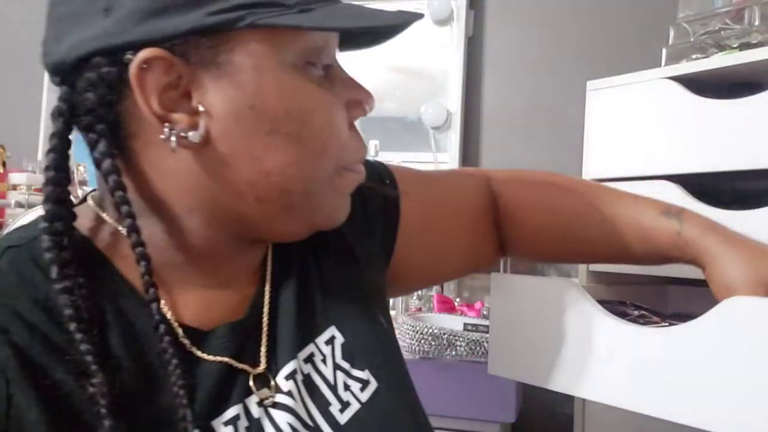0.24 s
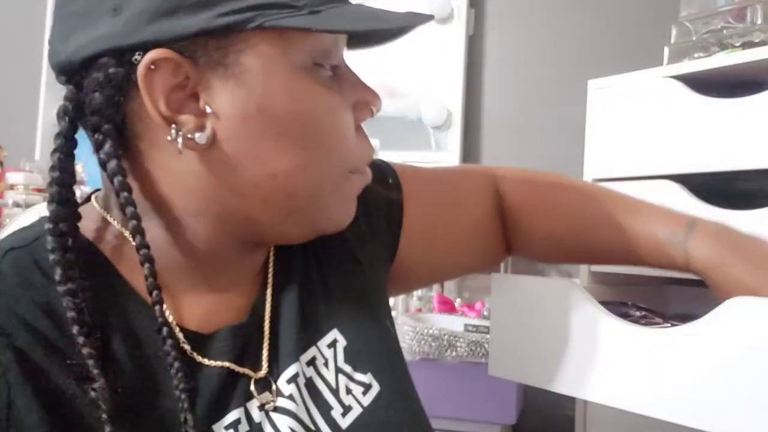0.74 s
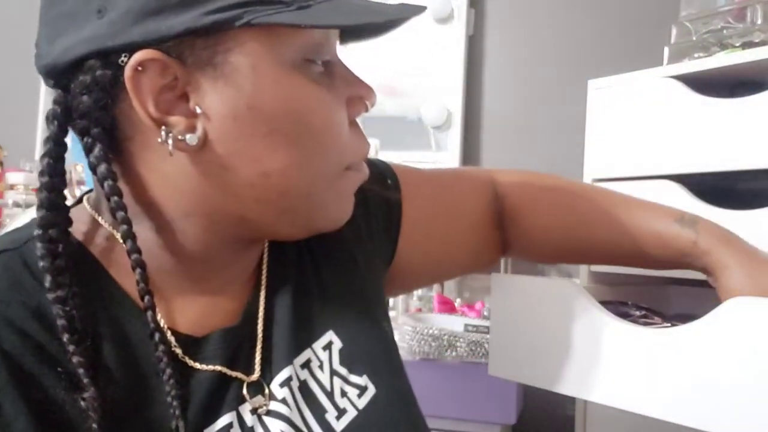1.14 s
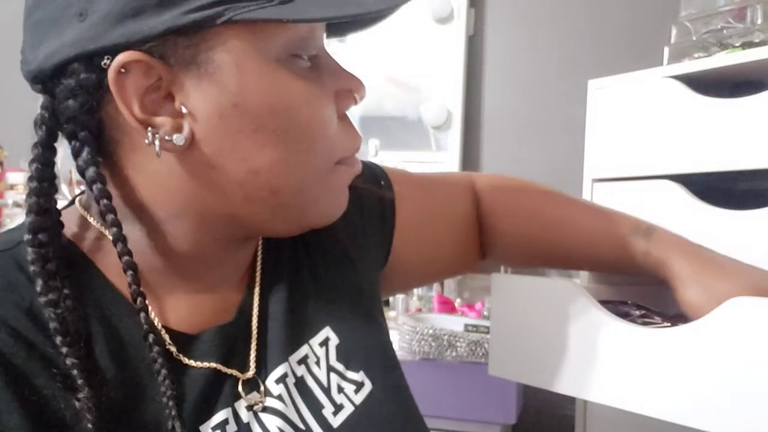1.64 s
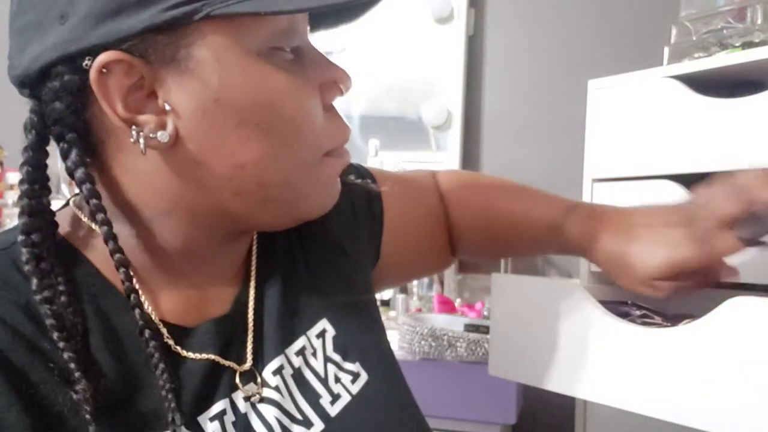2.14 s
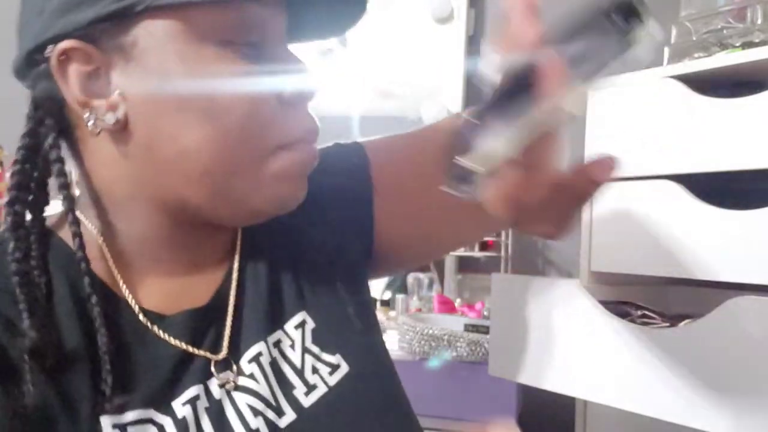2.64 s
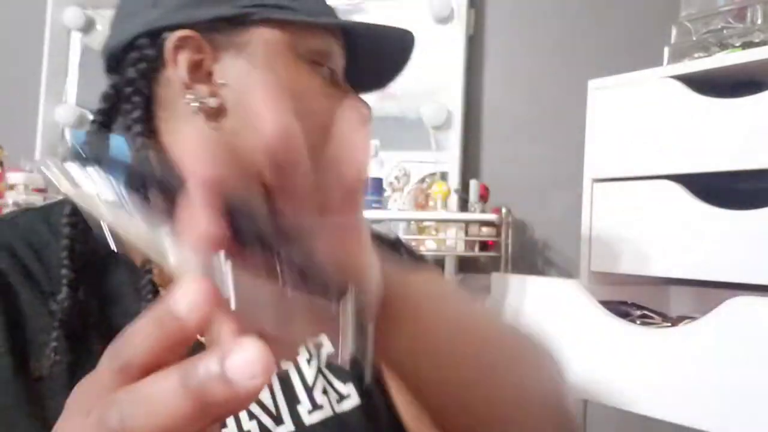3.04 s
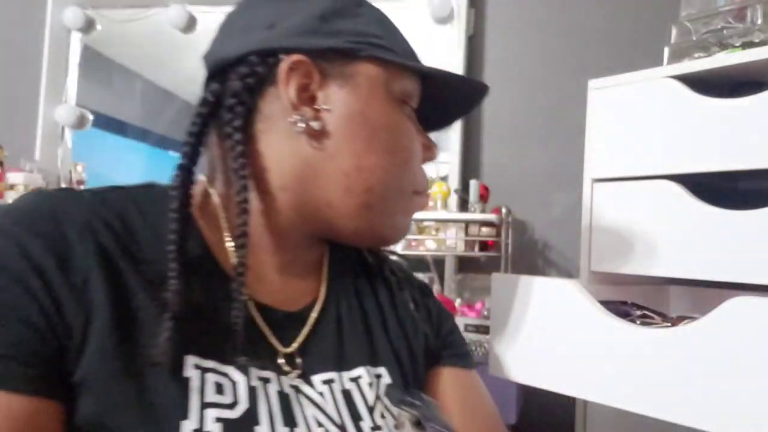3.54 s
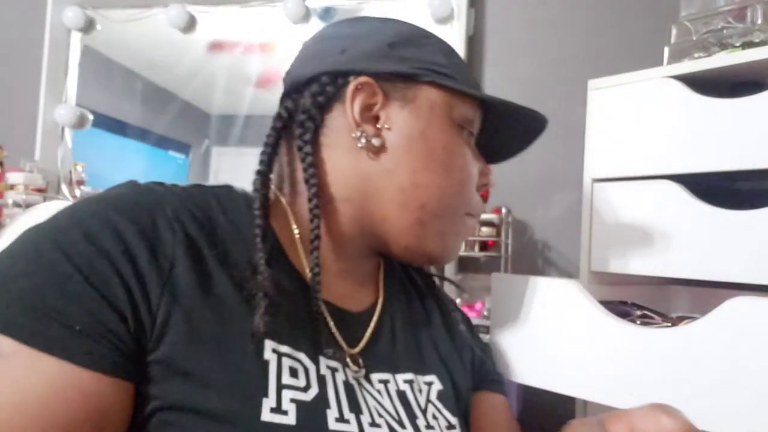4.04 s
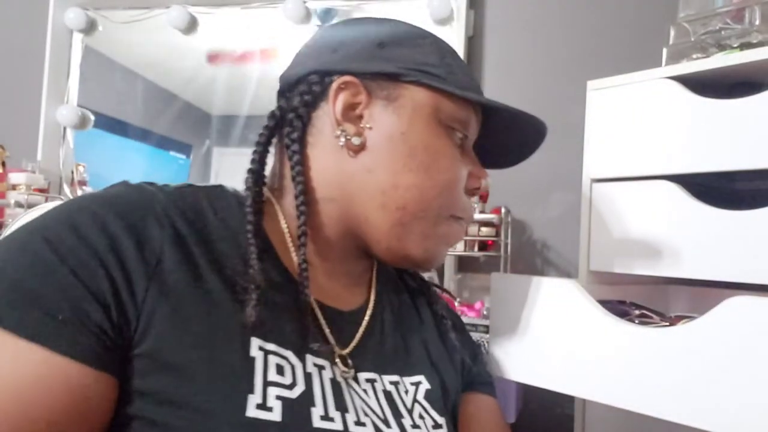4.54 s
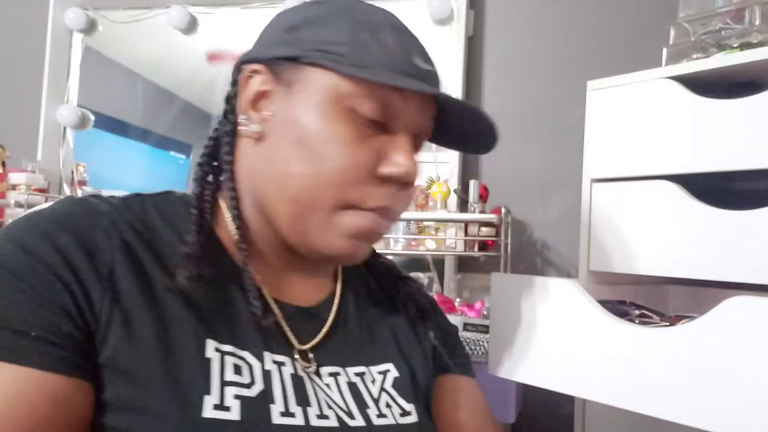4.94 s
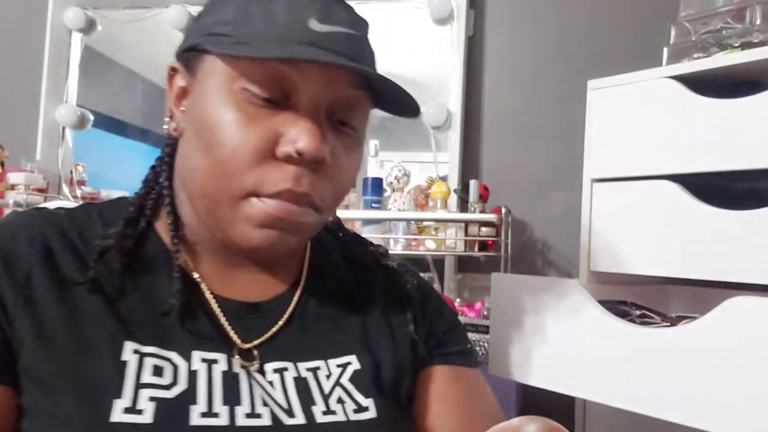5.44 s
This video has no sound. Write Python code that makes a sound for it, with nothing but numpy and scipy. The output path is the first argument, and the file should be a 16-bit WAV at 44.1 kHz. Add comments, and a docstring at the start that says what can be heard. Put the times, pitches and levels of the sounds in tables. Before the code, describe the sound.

Hollow plastic knocks and scrapes from searching a drawer, followed by soft, close crinkling of the wrap around a pair of sunglasses.

```python
"""A small quiet room, with a two-port stereo microphone and everything a little to its left.
A hand rummages in a plastic drawer: sunglasses knock and skid against its walls and set it ringing.
One pair is lifted out with a brush of sleeve, and close to the microphone its thin plastic wrap
crinkles as the creases snap over. Behind it all are a faintly throbbing fan, a low hum and still air."""
import sys
import numpy as np
from scipy import signal
from scipy.fft import rfft, irfft
from scipy.io import wavfile
from scipy.ndimage import uniform_filter1d

SR = 44100
rng = np.random.default_rng(int(sys.argv[2]) if len(sys.argv) > 2 else 0)


def int16_out(signal):
    """Quantize to a 16-bit WAV file."""
    q = np.round(np.clip(np.atleast_2d(signal).T, -1, 1) * 32767)
    wavfile.write(sys.argv[1], SR, q.astype(np.int16))


N = 250047
TIME = np.arange(N) / SR


# Blows in the drawer. Each row: start in seconds, relative level of the hollow knock in dB,
# then floor thump, clack and sharp edge in dB, each added to that level.
DRAWER_KNOCKS = [(0.156, -55.5, -29, 0.5, -16), (0.232, -25, -10.5, -5.5, -20.5),
                 (0.32, -35.5, -11, -4.5, -13.5), (0.358, -32.5, -2, 6, -6.5), (0.424, -24, -13, 2, -6.5),
                 (0.437, -29, -4.5, -5, 1), (0.475, -41.5, -8, -15, -19), (0.518, -37, -9, -1, -5.5),
                 (0.546, -40.5, -17, -24, -13), (0.907, -45, -12, -8, -21), (0.931, -41.5, -10, -6.5, -25),
                 (1.004, -35, -16, -7, -17), (1.02, -32, -11, 3, -5.5), (1.063, -31, -4, -3.5, -32),
                 (1.079, -45, -7, 7.5, -1), (1.168, -42, -31, -5.5, -13.5), (1.205, -44.5, -11, -6, -22),
                 (1.263, -39.5, -28, 0.5, -34), (1.297, -38, -6, 1, -7), (1.368, -57.5, 4.5, -25, 9.5),
                 (1.465, -40, -20, -5.5, -9), (1.484, -39, -24, -7, -1), (1.518, -53.5, 3, -22, 3.5),
                 (1.631, -52.5, -6, 4.5, -5), (1.72, -37.5, -40, -0.5, -10.5), (1.795, -46, -25, -2, -21),
                 (1.905, -29.5, -20, -6, -5.5), (1.928, -31, -10.5, -3.5, -5.5),
                 (2.029, -40, -11, -0.5, -16), (2.038, -37.5, -3.5, -0.5, -14), (2.061, -43.5, -1, 0, -11),
                 (2.143, -35.5, -6, 2.5, 2), (2.399, -54, -24.5, -20, -34.5)]

def rummage(gain_db=-6, skid_gain=0.54, skid_per_s=1100, skid_s=0.005, size=3000):
    """Sunglasses hit the drawer: a first contact, then a short skid of smaller ones."""
    out, t = np.zeros((2, N)), np.arange(size) / SR
    edges_hz = [30, 280, 1000, 4000, 20000]
    for start, db, thump, clack, edge in DRAWER_KNOCKS:
        contacts = skid_gain * sparse_clicks(skid_per_s, size) * np.exp(-t / skid_s)
        first = np.pad(drawer_ring(), ((0, 0), (0, size - 1)))
        skid = signal.fftconvolve(contacts[None], drawer_ring(), axes=1)
        levels_db = gain_db + db + np.array([thump + 1, 0, clack + 1, edge + 3])
        add(out, start, set_bands(first + skid, edges_hz, levels_db))
    return out


# Spectrum of a plastic clack. Each row: frequency in Hz, relative level in dB.
CLACK_SPECTRUM = [(60, -35.5), (130, -8), (240, -11.5), (390, 3), (680, 2.5), (1000, -0.5), (1300, 4.5),
                  (1800, -4), (3000, -3), (4500, -7), (7400, -7.5), (8800, -18.5), (12000, -14),
                  (15500, -19.5)]
# Modes of the drawer and its contents. Each row: frequency in Hz, relative level in dB, t60 in seconds.
DRAWER_MODES = [(146, -5, .12), (178, -12, .12), (379, 2, .18), (436, -12, .11), (648, -1, .14),
                (710, -2, .14), (895, -8, .1), (1094, -7, .14), (1239, 1, .13), (1287, -1, .11),
                (1397, -1, .12), (1737, -9, .1), (2028, -10, .08), (2520, -10, .08), (2871, -11, .08),
                (3709, -12, .07), (4908, -10, .07)]

def drawer_ring(ring_db=-0.5, wet_db=-3, size=12000):
    """One blow: a dense clack thrown about inside the drawer, plus the drawer's modes."""
    clack = unit_rms(colour(room(wet_db, near_s=.011, size=size), CLACK_SPECTRUM))
    modes = ring(DRAWER_MODES, vary_db=3.5, detune=.008, size=size)
    return clack + amp(ring_db) * modes


# Pushes across the drawer floor. Each row: start and length in seconds, relative level and treble in dB.
DRAWER_SHOVES = [(0.324, 0.038, -30, 2), (0.402, 0.016, -34.5, -3), (0.976, 0.047, -36, -8),
                 (1.153, 0.025, -61.5, 15.5), (1.256, 0.022, -33.5, -5.5), (1.458, 0.041, -41, -5),
                 (1.679, 0.022, -39, -9), (1.887, 0.057, -38.5, -26), (2.014, 0.011, -43, -10)]

def shoves(gain_db=-3, build_db=10.5, stir_db=-68, treble_hz=2500):
    """The hand stirs lightly as it searches; its pushes build up, then things slide to rest."""
    out = amp(stir_db) * slide(gesture(start=0.9, length=1.32, rise_s=0.03, fall_db_per_s=134))
    for start, length, db, treble_db in DRAWER_SHOVES:
        build = amp(build_db * np.clip((TIME - start) / length - 1, -1, 0))
        scrape = slide(build * gesture(start, length, rise_s=.004, fall_db_per_s=452.5))
        dull = signal.lfilter(*signal.butter(1, treble_hz, fs=SR), scrape + 1e-18)
        out += amp(gain_db + db) * (dull + amp(treble_db) * (scrape - dull))
    return out


def slide(force):
    """Things stick and slip as hard as they are pushed; every slip rings the drawer."""
    body = drawer_ring(ring_db=-5, wet_db=-4.5)
    slips = grains(per_s=970, spread_db=1.66) * force
    return excite(body, slips)


# Modes of a small hard part. Each row: frequency in Hz, relative level in dB, t60 in seconds.
PART_MODES = [(2050, -8, 0.1), (2880, -9, 0.08), (3690, 0, 0.04), (4040, 0, 0.05), (4450, -4, 0.035)]

def scuff(start=0.751, rub_s=0.031, rub_db=-58, touch_db=-64):
    """One thin squeak in the drawer: a light touch, then a rub that keeps the same modes ringing."""
    modes = ring(PART_MODES, vary_db=1, detune=.003, size=6000)
    force = gesture(start, rub_s, rise_s=rub_s, fall_db_per_s=237)
    out = amp(rub_db) * excite(modes, grains(per_s=1800, spread_db=2.5) * force)
    add(out, start, amp(touch_db) * modes / abs(modes).max())
    return out


# Creases snapping close to the microphone. Each row: start in seconds, relative level in dB,
# then body and top in dB, each added to that level.
WRAP_SNAPS = [(3.3203, -61.5, -6, -2), (3.6247, -63, -20, 8), (3.6642, -49.5, -29, -5.5),
              (3.7399, -50, -28, 5.5), (3.7527, -47, -7, 4), (3.759, -37, -13, -6), (3.7958, -45, -9, 1.5),
              (3.85, -45.5, -17, -3.5), (3.8821, -52.5, -20, -5), (3.9721, -45, -30, 0.5),
              (4.151, -46.5, 1.5, 0), (4.1764, -49, 0.5, 6), (4.209, -60, 2, 11), (4.2514, -50, -3, 3),
              (4.2989, -46.5, -2, -8), (4.3247, -39.5, -0.5, 1.5), (4.386, -39.5, -8, -3),
              (4.5728, -41.5, -9, -10), (4.7539, -43, -6.5, -23), (4.7738, -48, -2.5, 2),
              (4.83, -54, -7, 12), (4.8431, -47.5, -12, 7), (4.8848, -42.5, -26, 2),
              (4.9614, -47, -22, 3.5), (4.9848, -42, -28, 1), (5.015, -44, -26, -6),
              (5.0785, -47.5, -26, -0.5), (5.165, -46.5, -11, 1), (5.1783, -38.5, -13, 6.5),
              (5.1895, -38, -22, -7), (5.2051, -35, -18, -6), (5.2589, -50, -25, -6), (5.3415, -44, -5, 1),
              (5.3486, -51, -8, -1), (5.4177, -49, 1, -17), (5.4497, -51.5, -5.5, -2),
              (5.5638, -43.5, -7, -2), (5.6238, -51.5, -18, -11), (5.6614, -42, -10, -2)]
# Spectrum of a crease in the thin film. Each row: frequency in Hz, relative level in dB.
FILM_SPECTRUM = [(400, -13), (900, -7), (1250, -10.5), (1800, -3), (2800, 5.5), (4000, 4.5), (5500, 5.5),
                 (7500, 11), (8600, 1), (10000, 2), (12000, 5.5), (15500, 2)]
# Modes of the sunglasses' frame. Each row: frequency in Hz, relative level in dB, t60 in seconds.
FRAME_MODES = [(1225, 9, 0.045), (2620, -1, 0.035), (3215, -1, 0.03), (4000, -8, 0.03), (7500, 13, 0.07)]

def snaps(gain_db=-2, frame_db=-14, fold_db=3.2, flip_at_s=.0012, size=9000):
    """A crease flips, sets off its neighbours and taps the frame; hands and walls throw it back."""
    out, t = np.zeros((2, N)), np.arange(size) / SR
    fold_hz, edges_hz = np.geomspace(800, 16000, 22), [800, 3400, 9000, 20000]
    pulse = np.exp(-((t - flip_at_s) / .0003) ** 2)  # under a millisecond wide
    for start, db, body, top in WRAP_SNAPS:
        flip = unit_rms(rng.standard_normal((2, size)) * pulse)
        echo = amp(-1) * unit_rms(room(wet_db=-4, near_s=.005, size=size) * (t > flip_at_s))
        chain = .3 * sparse_clicks(per_s=700, size=size) * np.exp(-t / .006)
        neighbours = signal.fftconvolve(flip, chain[None], axes=1)[:, :size]
        film = colour(flip + echo + neighbours, FILM_SPECTRUM)
        # every fold has its own resonances
        fold = np.c_[fold_hz, fold_db * rng.standard_normal(len(fold_hz))]
        crack = unit_rms(colour(film, fold))
        crack += amp(frame_db) * ring(FRAME_MODES, vary_db=3, detune=.03, size=size)
        levels_db = gain_db + db + np.array([body - 1, 0, top + 3])
        add(out, start, set_bands(crack, edges_hz, levels_db))
    return out


# Fingers squeezing the wrap, close up. Each row: start and length in seconds, relative level in dB.
WRAP_SQUEEZES = [(3.314, 0.031, -65.5), (3.514, 0.13, -65), (3.772, 0.029, -65), (3.854, 0.074, -57.5),
                 (4.07, 0.34, -57), (4.117, 0.048, -49), (4.419, 0.039, -58), (4.564, 0.017, -56),
                 (4.755, 0.056, -54), (4.872, 0.019, -46.5), (4.994, 0.11, -55), (5.171, 0.037, -45.5),
                 (5.258, 0.25, -56), (5.55, 0.014, -48.5)]

def crinkle(gain_db=-0.5, clump_s=0.013, clump_db=5, patches=6):
    """Small creases give way in uneven clumps, each patch of film with its own short ring."""
    squeezes = [amp(db) * gesture(start, length, rise_s=0.0072, fall_db_per_s=192)
                for start, length, db in WRAP_SQUEEZES]
    pressure = np.linalg.norm(squeezes, axis=0)
    wander = np.interp(TIME / clump_s, np.arange(N), rng.standard_normal(N))
    clumps = unit_rms(amp(clump_db * wander))
    out = 0
    for _ in range(patches):
        clicks = grains(per_s=100, spread_db=4.2) * clumps * pressure
        patch = colour(room(wet_db=-3, near_s=.0015), FILM_SPECTRUM)
        out += excite(patch, clicks)
    return amp(gain_db) * out / np.sqrt(patches)


# Swings of the arm. Each row: middle and half length in seconds, relative level in dB.
ARM_SWINGS = [(2.85, 0.33, -72), (4.24, 0.64, -70), (5.507, 0.27, -59.5)]
# Spectrum of brushing cloth. Each row: frequency in Hz, relative level in dB.
CLOTH_SPECTRUM = [(300, -2.5), (700, 4.5), (1300, 8.5), (2500, -2), (7000, -2), (8800, -14.5),
                  (15000, -4.5)]

def sleeve():
    """Cloth hisses with the speed of the arm, which swells and sinks in each swing."""
    return swell(ARM_SWINGS) * noise(CLOTH_SPECTRUM)


# Tones of the fan in the background. Each row: multiple of the rotor speed, relative level in dB.
FAN_TONES = [(15, -78), (18, -82), (21, -79), (22, -74), (23, -70), (24, -76), (49, -85)]

def fan(rotor_hz=24.04):
    """Neighbouring multiples of the rotor speed beat into a throb, once for every turn."""
    angle = wavering_phase(rotor_hz, waver=0.002945)
    offsets = rng.uniform(-1.3, 1.3, len(FAN_TONES))
    return sum(amp(db) * np.cos(order * angle + offset) for (order, db), offset in zip(FAN_TONES, offsets))


# Spectrum of the room's rumble. Each row: frequency in Hz, relative level in dB.
RUMBLE_SPECTRUM = [(20, -49.5), (30, -13), (38, -6), (48, -7.5), (60, 7.5), (76, -16.5), (105, -7.5),
                   (150, -30), (300, -47)]
# Its swells. Each row: middle and half length in seconds, added level in dB relative to the steady rumble.
RUMBLE_SWELLS = [(0.72, 0.13, 7), (1.2, 0.23, 4.5), (2.0, 0.13, 10.5), (2.86, 0.06, 9.5), (3.26, 0.13, 8.5),
                 (4.14, 0.11, 9.5), (4.51, 0.06, 7), (5.58, 0.04, 10)]

def rumble(hum_hz=59.3, hum_db=-75, band_db=-69.5):
    """A low hum in a narrow band of rumble; they swell and sink together."""
    hum = amp(hum_db) * np.sin(wavering_phase(hum_hz, waver=0.014))
    band = amp(band_db) * noise(RUMBLE_SPECTRUM)
    return (hum + band) * np.hypot(1, swell(RUMBLE_SWELLS))


# Spectrum of the room tone. Each row: frequency in Hz, relative level in dB.
AIR_SPECTRUM = [(22, -20), (45, -6), (110, -6.5), (200, -13.5), (300, -11.5), (460, -8.5), (600, -6.5),
                (720, -15), (1000, -15.5), (1280, -15), (1550, -24), (2000, -20.5), (3300, -32),
                (7000, -33.5), (9000, -41), (15000, -35)]

def still_air(gain_db=-67.5):
    """A soft steady hush from all round the microphone."""
    return amp(gain_db) * noise(AIR_SPECTRUM)


# Reverberation of the small room. Each row: frequency in Hz, t60 in seconds.
ROOM_DECAY = [(100, 0.55), (400, 0.24), (1200, 0.25), (4000, 0.24), (8000, 0.15), (16000, 0.22)]

def room(wet_db, near_s, size=14000):
    """Response at the microphone: close reflections with time constant near_s, then the walls."""
    t = np.arange(size) / SR
    near = port_noise(size) * np.exp(-t / near_s)
    hz, frame_s, spectra = signal.stft(port_noise(size), SR, nperseg=256)
    decay = amp(-60 * frame_s / curve_at(ROOM_DECAY, hz)[:, None])
    walls = signal.istft(spectra * decay, SR, nperseg=256)[1][:, :size]
    build = 1 - np.exp(-t / 0.0088)
    return (unit_rms(near) + amp(wet_db) * unit_rms(walls * build)) / np.sqrt(size)


def ring(modes, vary_db, detune, size):
    """An object's modes after one blow; their strength and tuning vary with the spot struck."""
    t = np.arange(size) / SR
    hz, db, t60 = np.transpose(modes)[:, :, None]
    spot, load = rng.standard_normal((2, len(modes), 1))
    phase, apart = rng.uniform(-np.pi, np.pi, (2, len(modes), 1))
    fade = amp(db + vary_db * spot - 60 * t / t60) * (1 - np.exp(-t * hz))
    angle = 2 * np.pi * hz * (1 + detune * load) * t + phase
    apart = apart * np.minimum(hz / 1400, 1)  # high modes reach the two ports out of step
    return unit_rms(np.array([(fade * np.sin(angle + side * apart)).sum(0) for side in (0, 1)]))


def excite(response, clicks):
    """Every click sets off the response, scaled to unit energy at the left port."""
    return signal.oaconvolve(clicks, response / np.linalg.norm(response[0]), axes=1)[:, :N]


def set_bands(hit, edges_hz, levels_db):
    """Gives each band of a hit its peak level over 5 ms: a harder contact reaches higher."""
    out = 0
    for low, high, db in zip(edges_hz, edges_hz[1:], levels_db):
        highpass = signal.butter(2, low, "high", fs=SR, output="sos")
        lowpass = signal.butter(2, high, "low", fs=SR, output="sos")
        band = signal.sosfilt(np.vstack([highpass, lowpass] * 2), hit)
        peak_power = uniform_filter1d((band ** 2).mean(0), 220).max()
        out += amp(db) * band / np.sqrt(peak_power)
    return out


def gesture(start, length, rise_s, fall_db_per_s):
    """Envelope of a hand movement: it rises, holds until its length is up, and dies away."""
    t = TIME - start
    return np.clip(t / rise_s, 0, 1) * amp(-fall_db_per_s * np.maximum(t - length, 0))


def swell(rows):
    """Sum of smooth rises and falls, one for each row."""
    return sum(amp(db) * np.exp(-((TIME - middle) / half) ** 2) for middle, half, db in rows)


def wavering_phase(hz, waver, knots=24):
    """Phase of a cycle whose speed wanders a little."""
    drift = np.interp(TIME, np.linspace(0, TIME[-1], knots), rng.standard_normal(knots))
    return 2 * np.pi * np.cumsum(hz * (1 + waver * drift)) / SR


def sparse_clicks(per_s, size):
    """Clicks of random strength at random moments."""
    return rng.standard_normal(size) * (rng.random(size) < per_s / SR)


def grains(per_s, spread_db):
    """Random tiny clicks, a few much larger than the rest, at unit rms."""
    strength = amp(spread_db * np.minimum(rng.exponential(1, N), 4))
    clicks = strength * rng.choice([-1, 1], N) * (rng.random(N) < per_s / SR)
    return unit_rms(clicks[None])


def noise(spectrum):
    """Diffuse stereo noise with the given spectrum, at unit rms."""
    return unit_rms(colour(port_noise(N), spectrum))


def port_noise(size, alike_hz=950):
    """White noise at two microphone ports, which hear long waves alike and short waves apart."""
    hz = np.fft.rfftfreq(size, 1 / SR)
    alike = .96 / (1 + (hz / alike_hz) ** 4)
    left, other = rfft(rng.standard_normal((2, size)))
    return irfft([left, alike * left + np.sqrt(1 - alike ** 2) * other], size)


def colour(x, spectrum, size=4096):
    """Causal filter with the given spectrum, so that attacks stay sharp."""
    hz = abs(np.fft.fftfreq(size, 1 / SR))
    log_gain = np.log(amp(curve_at(spectrum, hz)))
    taps = np.fft.ifft(np.exp(signal.hilbert(log_gain).conj())).real  # minimum phase
    return signal.oaconvolve(x, taps[None, :size // 2], axes=1)[:, :x.shape[1]]


def curve_at(points, hz):
    """Interpolates on a log-frequency axis."""
    point_hz, values = np.transpose(points)
    return np.interp(np.log(hz + 1), np.log(point_hz + 1), values)


def amp(db):
    """Decibels to gain."""
    return 10 ** (np.asarray(db) / 20)


def unit_rms(x):
    """Scales to an rms of one."""
    return x / np.sqrt(np.mean(x ** 2) + 1e-20)


def add(mix, start_s, sound):
    """Mixes a stereo sound in at start_s."""
    part = mix[:, round(start_s * SR):][:, :sound.shape[1]]
    part += sound[:, :part.shape[1]]


def placed(x, left_db, lag_s=0):
    """Leans a sound towards the left port and delays it by lag_s at the right one."""
    left, right = np.broadcast_to(x, (2, N))
    return np.array([left, np.roll(right, round(lag_s * SR))]) * amp([[left_db / 2], [-left_db / 2]])


def scene():
    """From the microphone: drawer, hands and room tone just left of centre, the fan further left."""
    background = placed(still_air() + rumble(), left_db=2.5) + placed(fan(), left_db=11.5)
    drawer = placed(rummage() + shoves() + scuff(), left_db=2, lag_s=0.0002)
    hands = placed(snaps() + crinkle() + sleeve(), left_db=3.5)
    return drawer + hands + background


# Shading of the right microphone port. Each row: frequency in Hz, gain in dB.
PORT_SHADE = [(700, -1.5), (1300, -1.5), (2500, 0.9), (4500, -2), (8000, -2.5), (15000, 1.5)]

def record(dry, limit_hz=15750):
    """The slightly shaded right port, then the recorder's band limit."""
    heard = np.vstack([dry[:1], colour(dry[1:], PORT_SHADE)])
    lowpass = signal.firwin(301, limit_hz, window=("kaiser", 8), fs=SR)
    return signal.oaconvolve(heard, lowpass[None], "same")


dry = scene()
out = record(dry)
int16_out(out)
```